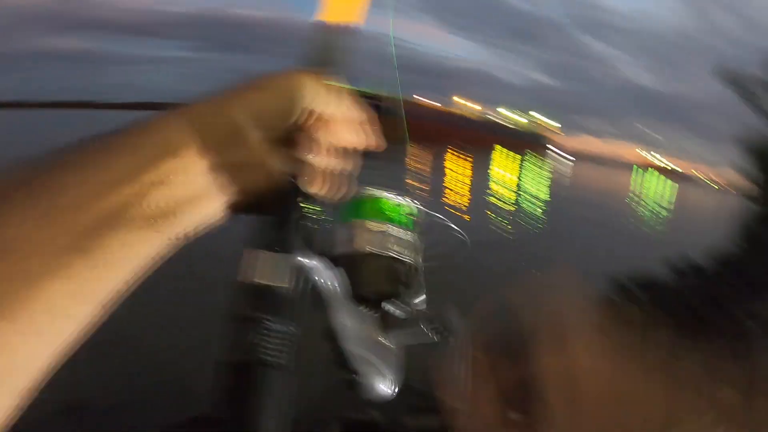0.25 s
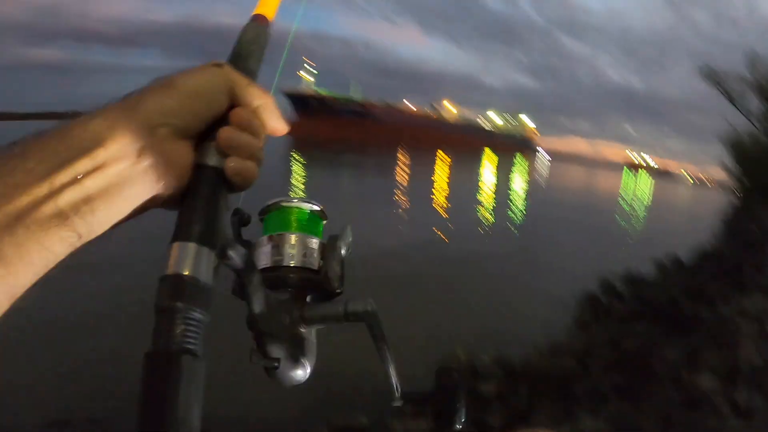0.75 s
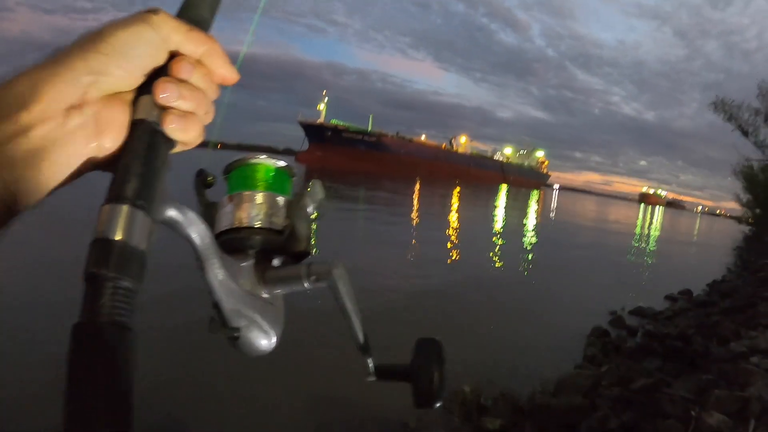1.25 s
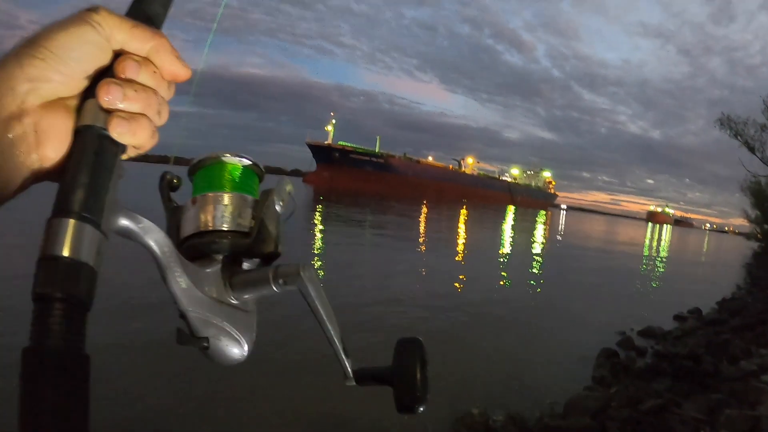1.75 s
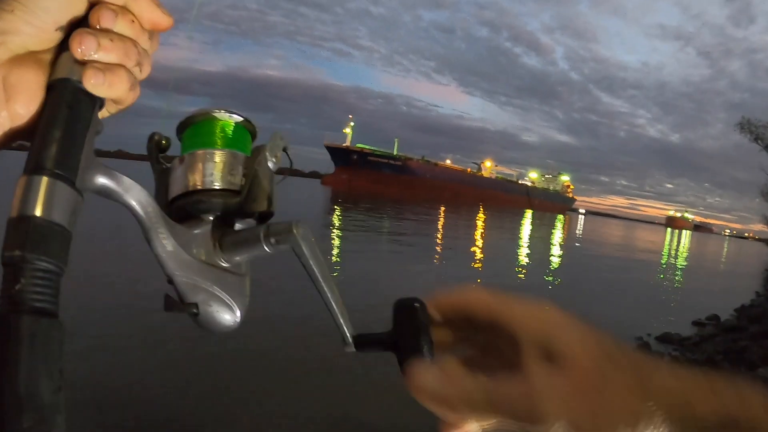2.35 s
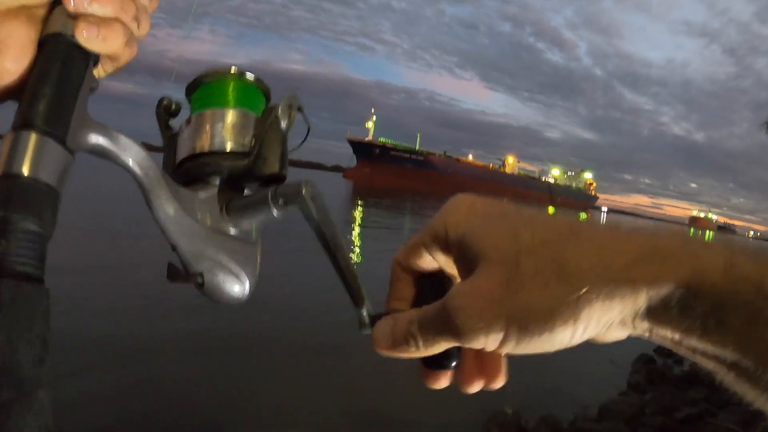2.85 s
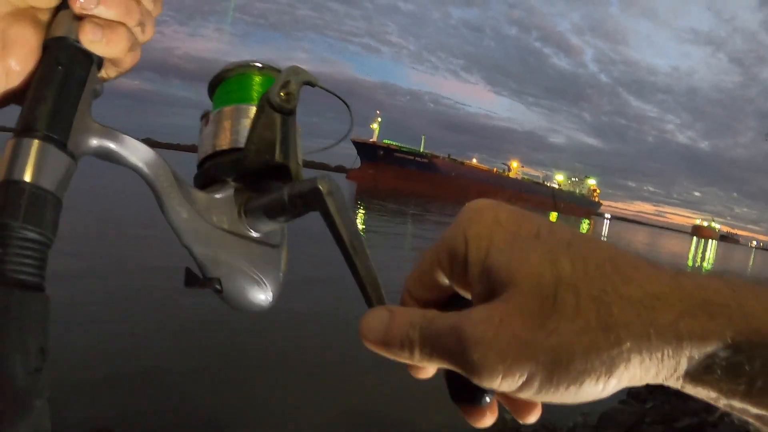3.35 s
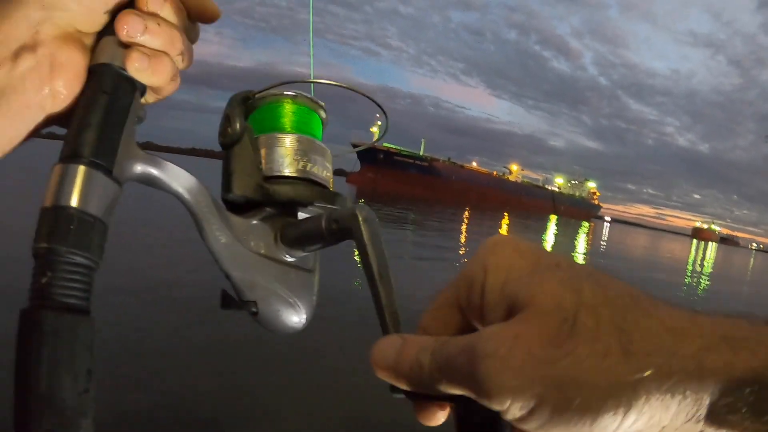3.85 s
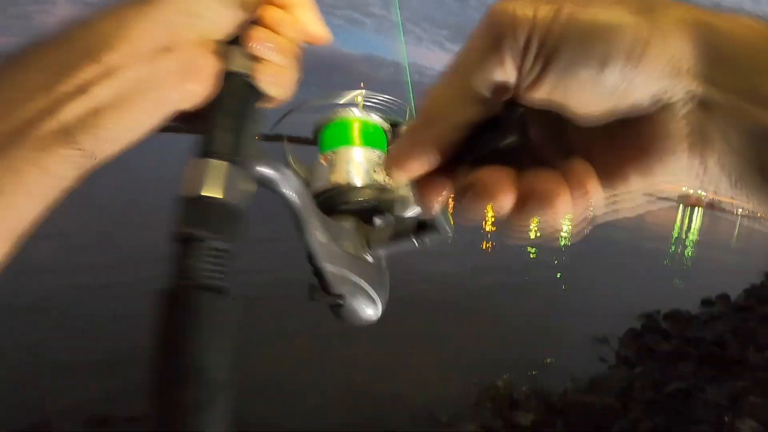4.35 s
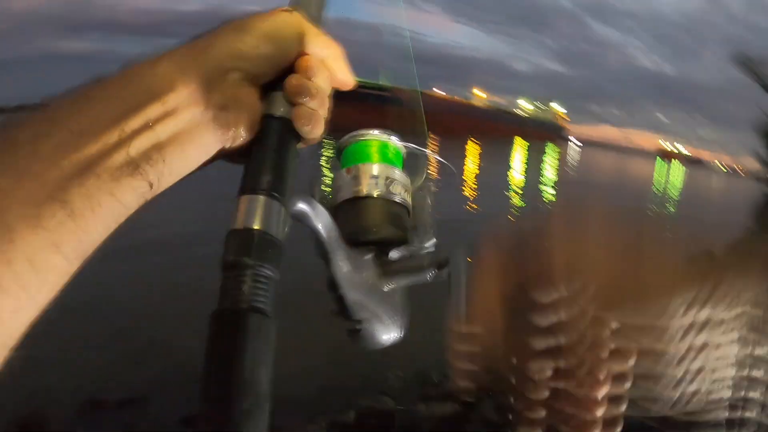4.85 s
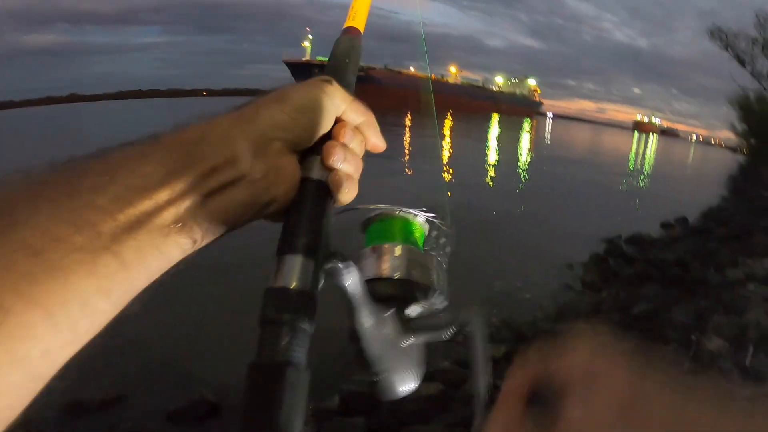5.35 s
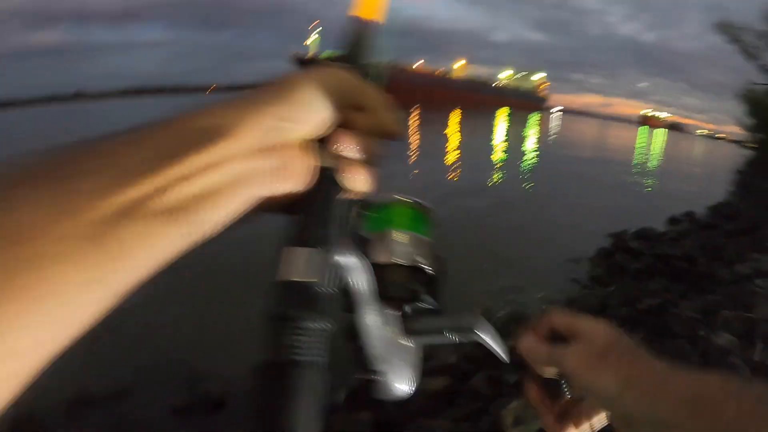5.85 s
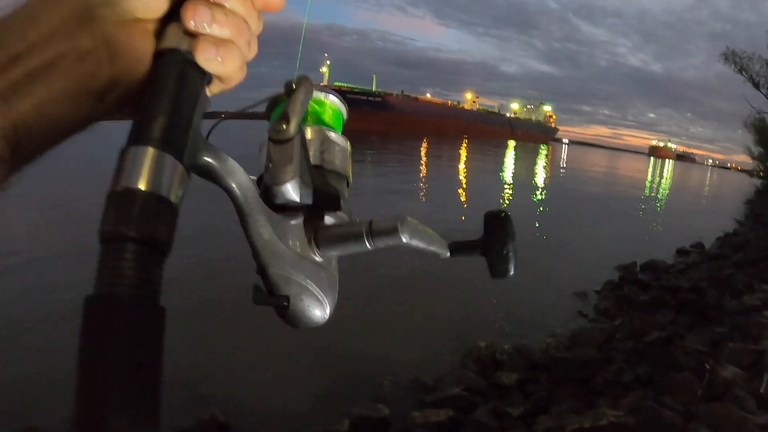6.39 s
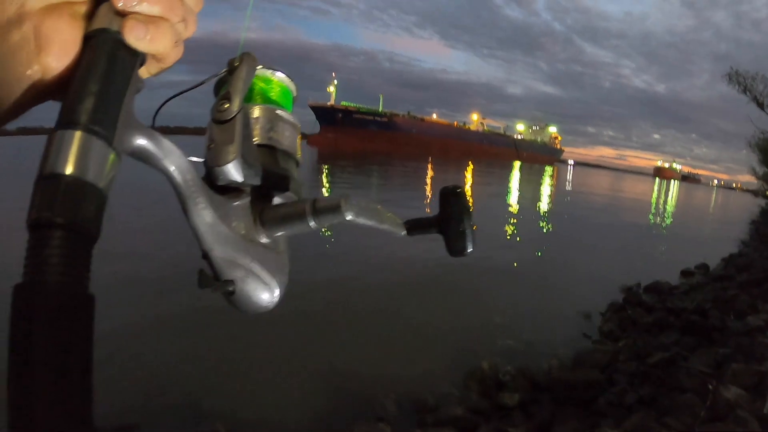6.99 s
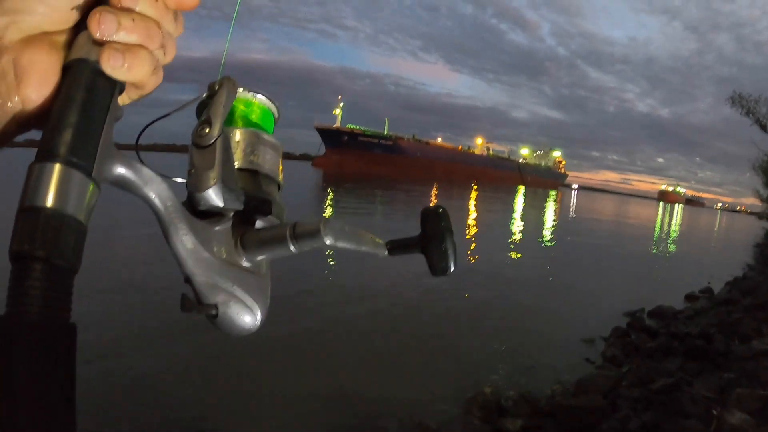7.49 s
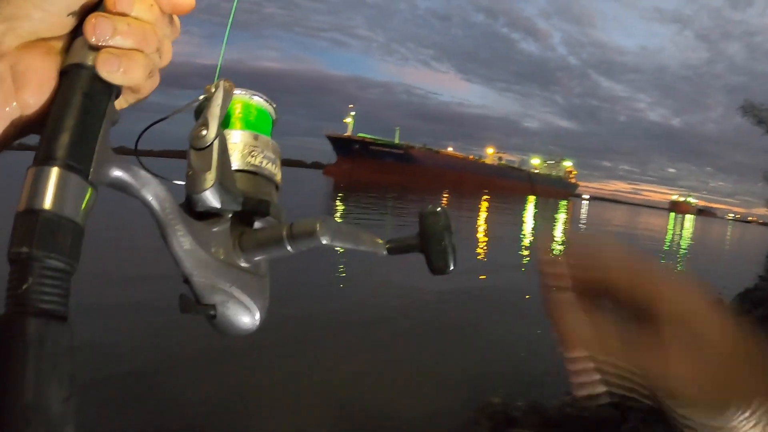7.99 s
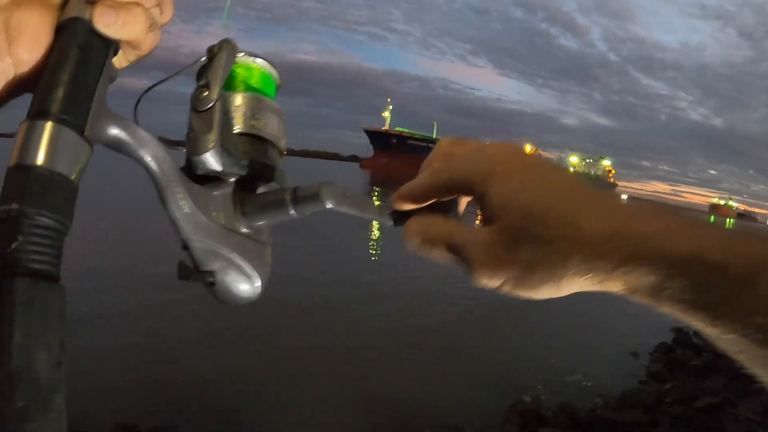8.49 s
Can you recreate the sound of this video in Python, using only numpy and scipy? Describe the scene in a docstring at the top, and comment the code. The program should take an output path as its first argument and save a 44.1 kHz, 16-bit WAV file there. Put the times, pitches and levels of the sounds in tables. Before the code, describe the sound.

Distant ship engines throb deeply while a fishing reel close by whirrs, ticks, squeaks and clacks to a stop twice, under a faint high whine.

```python
"""Reel by a working river

Far out on a river a ship and its tugs drone: the partials of four engine cycles over smooth low rumble.
Close by, a spinning reel is wound in two long bouts and a few short nudges. Gear teeth scuff body resonances
and the rotor hisses; struck parts tick and knock, parts rub, the line roller squeaks, line and wire snap.
A thin steady whine, a single tone with a faint flutter, hangs above everything, almost wholly on the left.
"""
import sys
import numpy as np
from scipy import signal
from scipy.fft import rfft, irfft
from scipy.io import wavfile

SR = 44100
rng = np.random.default_rng(int(sys.argv[2]) if len(sys.argv) > 2 else 0)


def master(y):
    """Save y as 16-bit WAV."""
    cut = np.clip(np.atleast_2d(y).T, -1, 1)
    pcm = np.round(cut * 32767)  # scale
    wavfile.write(sys.argv[1], SR, pcm.astype(np.int16))


N = 384993
T = np.arange(N) / SR   # seconds
HZ = np.maximum(np.arange(N // 2 + 1) * SR / N, 1)   # frequency of each FFT bin

# Engine cycle rates; the governor of the main engine hunts. Each row: time in seconds, cycle rate in Hz.
MAIN_CYCLE = [(0, 9.61), (.5, 9.619), (1.4, 9.595), (2.05, 9.625), (3.1, 9.604), (3.85, 9.617),
              (4.55, 9.595), (5.15, 9.629), (5.9, 9.611), (6.4, 9.588), (7.5, 9.608), (8.0, 9.633),
              (8.45, 9.604), (8.73, 9.609)]
SLOW_CYCLE = [(0, 5.9936), (8.73, 6.0024)]
TUG_CYCLE = [(0, 8.6776), (8.73, 8.6864)]
FAST_CYCLE = [(0, 22.455), (8.73, 22.473)]
# Exhaust partials of each engine. Each row: multiple of the cycle rate, early level in dB, late level in dB.
MAIN_PARTIALS = [(4, -52, -56), (7, -46, -46), (8, -47, -46), (9, -55, -59), (11, -53, -55), (12, -47, -35),
                 (13, -52, -49), (14, -52, -52), (15, -51, -49), (16, -31, -30), (17, -39, -38),
                 (18, -44, -50), (19, -40, -44), (20, -53, -52), (21, -50, -59), (22, -55, -56),
                 (23, -50, -53), (24, -54, -49), (25, -56, -47), (26, -49, -49), (27, -41, -37),
                 (28, -59, -53), (29, -47, -46), (30, -52, -50), (31, -55, -53), (32, -62, -58),
                 (33, -53, -56), (34, -58, -58), (35, -58, -58), (36, -57, -57), (37, -56, -55),
                 (38, -62, -56), (45, -63, -61), (47, -62, -58), (48, -64, -59), (49, -58, -62),
                 (50, -61, -61), (51, -66, -63), (52, -66, -62), (55, -62, -61), (62, -68, -61),
                 (64, -64, -54), (65, -66, -62), (66, -63, -57), (67, -61, -52), (68, -66, -62),
                 (69, -63, -56), (70, -63, -62), (72, -68, -64)]
SLOW_PARTIALS = [(5, -57, -56), (6, -42, -42), (7, -54, -52), (8, -50, -49), (9, -43, -44), (11, -49, -50),
                 (12, -37, -37), (14, -45, -44), (20, -46, -45), (21, -49, -50), (36, -61, -57),
                 (39, -58, -57)]
TUG_PARTIALS = [(12, -51, -50), (14, -52, -50), (15, -50, -55), (16, -39, -39), (17, -50, -52),
                (20, -39, -41), (21, -44, -49), (29, -58, -58), (32, -55, -53), (33, -54, -62),
                (34, -58, -64)]
FAST_PARTIALS = [(2, -46, -45), (3, -40, -41), (4, -44, -48), (5, -44, -31), (6, -56, -56)]
# The exhausts swing from early to late colour between these two times.
MAIN_TURN_S, TUGS_TURN_S = (2.5, 5), (4, 8)

# Colour of distant rumble, wash and air. Each row: frequency in Hz, relative density in dB per Hz.
RUMBLE_COLOUR = [(15, -17.5), (25, -4.5), (40, 1), (70, 1.5), (100, -1), (130, 1), (200, -4), (270, -8),
                 (360, -10), (450, -12), (530, -15), (640, -20), (800, -21), (1000, -20), (1700, -32),
                 (2700, -40), (3700, -42), (4500, -51), (5000, -51), (5400, -43.5), (6200, -66),
                 (12000, -93.5)]
# Loudness of the rumble. Each row: time in seconds, level in dB.
RUMBLE_LEVEL = [(0, -33.5), (3, -33.5), (6, -33.5), (8.73, -33)]

# Pitch of the whine. Each row: time in seconds, frequency in Hz.
WHINE_PITCH = [(0, 5394.43), (8.73, 5395.1)]
WHINE_DB, WHINE_RIGHT_DB = -53.5, -33.5   # level on the left; leak into the right, relative to the left
WHINE_WANDER_RAD = 0.45

# Housing shadow on the two microphone ports, for the reel close by and for the river.
# Each row: frequency in Hz, left minus right in dB.
REEL_SHADOW = [(400, 1.5), (700, -3), (1050, -3.5), (1700, 1), (2800, 3.5), (3800, 5), (4700, -3.5),
               (6000, -1.5), (8000, -10.5), (11000, -8), (15000, -3.5)]
RIVER_SHADOW = [(60, .7), (200, .1), (400, .8), (700, 0.9), (1050, 1.2), (1700, 5.3), (2800, 1.9),
                (3800, 11), (4700, 2.9), (6000, 1.5)]
# Share that each port hears alone, for reel and river. Each row: frequency in Hz, level in dB re the shared sound.
REEL_UNLIKE = [(640, -2.5), (1050, -8.5), (1700, -16.5), (2800, -9.5), (3800, -3), (4700, -3), (6000, 2),
               (8000, 3)]
RIVER_UNLIKE = [(30, -18.5), (100, -14.5), (300, -17.5), (640, -2.5), (1050, -6), (1700, -7.5),
                (3800, -2.5), (4700, 2), (6000, 9)]
LEFT_LAG_S = 2.6 / SR

# Dry high snaps of line and bail wire. Each row: time in seconds, peak level in dB ahead of the treble filter.
SNAPS = [(0.0796, -37.5), (0.13, -39.5), (0.147, -38.5), (0.19, -41.5), (0.2339, -35), (0.3825, -39),
         (0.497, -32.5), (0.5801, -28.5), (0.6745, -37), (0.706, -40), (0.7635, -38), (0.804, -47),
         (0.9875, -64), (1.8655, -70), (2.5476, -67.5), (2.57, -57), (2.6951, -65.5), (2.7316, -70.5),
         (2.771, -69.5), (2.8573, -72), (3.1591, -65), (3.192, -65), (3.2908, -64.5), (3.4549, -71.5),
         (3.6856, -52.5), (4.063, -51.5), (4.2845, -24.5), (4.3789, -42.5), (4.451, -47), (4.4781, -29),
         (4.5524, -37), (4.6069, -44), (4.721, -46), (4.7991, -27.5), (4.9955, -44.5), (5.068, -51),
         (5.1173, -46.5), (5.2224, -28.5), (5.2764, -40.5), (5.3993, -37.5), (5.5396, -45), (5.5987, -41),
         (5.6645, -37.5), (5.695, -28.5), (5.964, -57), (5.994, -29), (6.5051, -41.5)]
SNAP_T60_S = 0.0074
# Faint snaps: upper level re the rotor hiss; at rest, rod and line creak faintly in the hand at the idle level.
FAINT_SNAPS_PER_S, FAINT_SNAP_DB, IDLE_SNAP_DB = 17, 27, -74

# Short squeaks of the line roller.
# Each row: time in seconds, peak level in dB, starting pitch in Hz, decay by 60 dB in seconds.
SQUEAKS = [(0.19, -26.5, 2954, 0.033), (0.308, -37, 2703, 0.031), (0.522, -34, 3180, .03),
           (0.706, -32.5, 3560, .03), (4.563, -37, 3710, 0.044), (5.633, -34.5, 2910, 0.031),
           (5.745, -29.5, 2850, 0.035), (5.762, -29.5, 3050, 0.031), (5.769, -34, 3040, .02),
           (5.78, -38.5, 3110, 0.043), (5.804, -23.5, 3119, 0.0258), (5.814, -35.5, 3050, .02),
           (5.843, -32.5, 3157, .05), (6.008, -24.5, 3235, .05), (6.024, -37, 3223, 0.054),
           (6.604, -50.5, 2987, 0.0396), (6.982, -41, 3050, 0.066)]
SQUEAK_RISE_S, SQUEAK_GLIDE_HZ_PER_S = .002, 10000

# Slow or dragging turns of the handle rub one part into a narrow ring.
# Each row: the two ends of the stroke in seconds (either order), pitch in Hz, width in Hz, level in dB.
RUBS = [(3.37, 3.46, 2220, 300, -52), (3.6, 3.77, 2120, 340, -60), (3.83, 4.51, 2260, 240, -53),
        (6.02, 6.01, 2143, 147, -46), (6.45, 6.277, 3360, 300, -52.5)]

# Ticks and knocks of the reel. Each row: time in seconds, nominal level in dB, pitch of the struck part in Hz,
# boost of the low thump modes in dB, boost of the high crack modes in dB.
TICKS = [(0.0482, -27, 1345, 2.5, -25.5), (0.188, -47, 2900, -23, -30), (0.238, -32, 1717, -6.5, -25),
         (0.3105, -31, 2650, -12, -25), (0.385, -31.5, 2400, -10.5, -27), (0.4546, -36.5, 2420, 0.5, -25),
         (0.5, -34, 2920, -9, -22.5), (0.5227, -39.5, 3080, -2, -25.5), (0.5621, -40.5, 2390, -12, -25),
         (0.59, -29, 3146, -2, -14.5), (0.621, -27.5, 3100, -10, -25), (0.675, -35.5, 2210, -13, -20.5),
         (0.708, -44.5, 3555, -9.5, -19.5), (0.744, -32.5, 3750, -4, -20),
         (0.7632, -18.5, 1790, -5.5, -4.5), (0.7655, -13.5, 3365, -16, -18.5),
         (0.7696, -18.5, 3034, -10.5, -7.5), (0.775, -29.5, 2500, -4, -11.5), (0.7838, -28, 3760, -9, -9),
         (0.7872, -25, 3670, -20, -7.5), (0.795, -28.5, 3660, 0, -8), (0.7998, -28.5, 3640, -11, -14),
         (0.804, -29, 2930, -10, 1), (0.826, -30, 3300, -10, -21.5), (0.83, -15.5, 2763, -18.5, -22),
         (0.862, -34.5, 2940, -16, -37), (0.869, -38, 3607, -12, -30.5), (0.918, -40.5, 2580, -13.5, -7),
         (0.933, -45, 3270, -4.5, -22), (0.987, -45, 2500, -6, -19), (1.061, -46, 3590, -6, -8),
         (1.093, -42.5, 3430, -7, -24.5), (2.2767, -42.5, 3860, -10.5, -34), (2.383, -38, 2393, -13, -26.5),
         (2.388, -35, 1900, -11, -33.5), (2.462, -39, 2774, -5, -34), (2.546, -34.5, 2585, -11, -15.5),
         (3.6022, -38.5, 2123, -14, -30.5), (3.617, -41.5, 2100, -15, -31.5),
         (3.6341, -50, 3231, -11.5, -28.5), (3.6664, -56.5, 2000, -8, -28), (3.686, -28, 2100, 1.5, -24),
         (3.696, -41, 2980, -5.5, -6), (3.718, -34.5, 2130, -2, -24.5), (3.728, -45, 2120, -6.5, -30.5),
         (3.7396, -30.5, 2200, 8.5, -31.5), (3.7653, -38, 1670, 13, -29), (3.78, -32.5, 2930, 1.5, -19.5),
         (3.8152, -34, 2090, -5.5, -31.5), (3.9365, -44.5, 2050, -12, -31),
         (3.956, -48.5, 2115, -11, -28.5), (3.981, -29, 2130, 4.5, -39.5),
         (4.0128, -32.5, 2140, -13.5, -35), (4.039, -29, 2372, -1, -26.5), (4.053, -36.5, 3300, -8, -5.5),
         (4.0687, -30.5, 2190, -8, -29), (4.093, -34, 2070, -9.5, -32.5), (4.105, -26, 2140, -4, -19),
         (4.148, -31.5, 2140, -2.5, -28), (4.182, -31, 2310, -5.5, -26), (4.2153, -31.5, 2356, 6.5, -26),
         (4.2363, -32.5, 1880, -6.5, -27.5), (4.2834, -23.5, 2578, 2.5, -31.5),
         (4.3151, -36, 2280, -13.5, -28), (4.38, -30.5, 2320, -14, -6), (4.4518, -35.5, 2100, -12, -25),
         (4.5955, -38.5, 1770, -10, -26.5), (4.621, -31, 1600, -4, -26.5), (4.7451, -41.5, 1860, -11, -28),
         (4.774, -47, 1807, -17, -29), (4.817, -27.5, 1760, -3, -25.5), (4.8548, -37.5, 1900, -6.5, -28),
         (4.96, -30, 1890, -8.5, -32.5), (4.983, -29.5, 1690, -9, -24), (5.023, -25.5, 1784, -10, -25.5),
         (5.04, -26, 2520, -21, -23), (5.069, -30.5, 1860, -14.5, -5), (5.222, -30.5, 3250, -9, -19.5),
         (5.269, -30.5, 1730, -11, -20.5), (5.283, -43.5, 2600, -14, -25.5),
         (5.2992, -30, 3067, -13, -15.5), (5.38, -27, 1800, -7.5, -30), (5.53, -40.5, 2900, -15.5, -22),
         (5.591, -25.5, 1777, 4.5, -25), (5.634, -31, 2928, 3.5, -12), (5.664, -28.5, 3070, -4.5, -21),
         (5.7049, -32, 3130, -8, -6), (5.68, -34.5, 1900, -6.5, -22.5), (5.804, -35, 3700, -15.5, -18),
         (5.843, -35, 2600, -10, -11.5), (5.958, -40.5, 3950, -4, -19), (5.988, -31, 1935, -10.5, -6),
         (5.995, -15, 2240, -4.5, -6.5), (5.999, -14.5, 3287, -7.5, -15), (6.0023, -13, 1578, -0.5, -15.5),
         (6.008, -28.5, 3520, 1, -12), (6.0203, -21.5, 1710, 1, -23.5), (6.0697, -19.5, 1853, -11.5, -13),
         (6.087, -31.5, 3030, -19.5, -37), (6.113, -28, 2384, -20, -32),
         (6.1265, -29.5, 2960, -14.5, -41.5), (6.279, -31.5, 1260, 0.5, -30), (6.35, -38, 3950, -12, -23.5),
         (6.504, -37.5, 3640, -25.5, -9.5), (6.604, -42, 3072, -3.5, -25),
         (6.764, -43.5, 3670, -20.5, -9.5), (6.515, -47, 3720, -21.5, -20),
         (6.528, -45.5, 3590, -18.5, -13.5), (6.77, -46.5, 3520, -16.5, -12.5),
         (6.9169, -50, 3480, -14.5, -24.5), (6.9773, -33.5, 3129, -11, -23.5), (7.66, -41.5, 1622, -6, -35),
         (7.812, -49, 4400, -21.5, -23.5), (8.042, -50.5, 1760, 2.5, -34), (8.21, -36.5, 3660, -14, -27),
         (8.516, -56, 5294, -10.5, -10.5), (8.645, -58.5, 5300, -11.5, -5.5), (1.566, -45, 3440, -16, -21),
         (8.668, -55, 3950, -9.5, -12.5)]
# Modes a tick can ring with. Each row: frequency in Hz, relative level in dB, decay by 60 dB in seconds.
REEL_MODES = [(527, 0.5, 0.016), (920.6, 0, 0.025), (1159, -5, 0.012), (1605, -13, 0.0088),
              (1758, 1.5, 0.016), (2107, 4, 0.0087), (2330.4, -3.5, 0.014), (2859, -0.5, 0.011),
              (3204, 0, 0.018), (3449, 1, .014), (3879, -1, 0.015), (4103, -8.5, 0.0091), (5482, -3, 0.01),
              (6087, 12.5, 0.0035), (7090, 2, 0.013), (7680, 1, 0.0097), (8490, -3.5, 0.014),
              (9800, -1, 0.0037), (10500, -10.5, .005), (12700, -12, .004)]
THUMP_TOP_HZ, CRACK_FOOT_HZ = 1400, 6000
# Between soft and hard touches these two slide: decay of the struck part, and how far other modes fall behind.
SOFT_DB, HARD_DB = -40, -24
SOFT_PART_T60_S, HARD_PART_T60_S = .022, .010
SOFT_FAR_DB, HARD_FAR_DB = 15, 8
# Contacts in a tick: decay for a -9.5 dB knock, and the step in dB that doubles it.
RATTLE_T60_S, RATTLE_DOUBLES_DB, RATTLE_RISE_S = 0.00788, 20, 0.00051
TICK_PAN_DB = 0.5   # left-right scatter
# Faint ticks of loose parts: upper level re the whirr, then their thump and crack boosts.
LOOSE_PER_S, LOOSE_DB, LOOSE_THUMP_DB, LOOSE_CRACK_DB = 30, -9, -4.5, -23
MOST_TICKS = 250

# Turning the handle, one list per stroke. Each row: time in seconds, gear whirr in dB, rotor hiss in dB,
# swell of the side-plate ring in dB.
WINDING = [
    [(0.0, -35, -60, 1), (0.3, -35, -54, 4), (0.36, -39.5, -56.5, 2), (0.43, -32.5, -51, 1.5),
     (0.65, -37, -56.5, 2), (0.71, -44.5, -61.5, -4), (0.75, -53.5, -50.5, -13.5), (0.9, -59, -72.5, -6.5),
     (1.12, -62.5, -77, -2.5)],
    [(3.3, -60.5, -85.5, -2), (3.42, -41, -85, 5), (3.53, -65.5, -93.5, 0.5)],
    [(3.57, -62.5, -87, -0.5), (3.61, -58, -88.5, -1.5), (3.75, -45, -79.5, 5), (3.82, -45.5, -84, 0.5),
     (3.87, -77, -89.5, 0)],
    [(3.9, -57, -89, 3.5), (3.98, -52.5, -90, 6.5), (4.07, -43, -86.5, 0), (4.27, -42, -63.5, -1),
     (4.55, -40.5, -59.5, -1), (4.78, -41, -59, -1.5), (4.83, -36.5, -59, 2.5), (4.93, -40.5, -59, 2),
     (5.07, -37, -55.5, 5), (5.17, -42, -58.5, -4.5), (5.28, -38.5, -56.5, 2.5), (5.44, -44, -63, 3.5),
     (5.55, -39.5, -59.5, -3), (5.69, -37.5, -53.5, 4), (5.8, -42.5, -57.5, -6), (5.94, -51, -78.5, 0.5),
     (5.98, -48.5, -52.5, 6.5), (6.1, -66.5, -73, -3.5)],
    [(6.19, -72, -83.5, -5), (6.27, -39, -87, 1), (6.32, -64, -84, 1.5)],
]
# Reel body under running gears. Each row: resonance in Hz, width in Hz, relative level in dB.
GEAR_BODY = [(542.6, 234, -7), (980, 180, -4.5), (1243.8, 81, 2), (1460, 1000, -9.5), (1750, 500, -16),
             (1917.7, 170, -5), (2205.5, 140, -6), (2408, 125, -1.5), (2846, 440, -12), (3267, 470, -11.5),
             (3648, 220, -12), (3960, 2000, -23)]
SIDE_PLATE_HZ = (1100, 1400)
# Colour of the rotor hiss. Each row: frequency in Hz, relative density in dB per Hz.
ROTOR_COLOUR = [(4000, -12), (6000, 6), (7000, -5), (8600, -3), (10000, -10.5), (12400, -9.5),
                (13500, -26.5), (16000, -26)]
# Gear teeth meshing. Each row: time in seconds, teeth per second.
MESH_RATE = [(0, 58), (.52, 59), (.7, 57), (3.3, 28), (4.4, 30), (4.75, 40), (5.0, 44.5), (5.45, 46.5),
             (5.9, 50.5)]
MESH_DEPTH_DB, MESH_JITTER_RAD = 4, .6
# The louder the rotor hiss, the brighter the gears: dB per octave at FREE_HISS_DB, and its gain per dB of hiss.
BRIGHT_DB, BRIGHT_PER_DB, FREE_HISS_DB = -1.0, .06, -54.5
# Listed ticks jolt gears and rotor into a short scuff: scuff re the tick, hiss re the scuff.
JOLT_DB, JOLT_HISS_DB, JOLT_T60_S = -16, -17.5, 0.072
# Body resonances slide as the load on the turning parts shifts: share of the speed, changes per second.
WAVER_SHARE, WAVER_PER_S = .022, 6.0


def from_db(db):
    """Decibels to gain."""
    return 10 ** (np.asarray(db) / 20)


def rms_one(x):
    """Scale to rms 1."""
    return x / np.sqrt(np.mean(x ** 2) + 1e-20)


def per_bin(points):
    """Turn (Hz, dB) rows into a gain at every FFT bin."""
    hz, level_db = np.transpose(points)
    return from_db(np.interp(np.log(HZ), np.log(hz), level_db))


def coloured(x, points):
    """Filter by (Hz, dB) rows."""
    return irfft(rfft(x) * per_bin(points), N)


def drift(rate):
    """Slow random wandering, around `rate` changes a second, with spread 1."""
    knots = rng.standard_normal(int(T[-1] * 60) + 60)   # 60 a second
    r = np.exp(-2 * np.pi * rate / 60)
    slow = signal.lfilter([1], [1, -2 * r, r * r], knots)[58:]
    return np.interp(T * 60, np.arange(len(slow)), rms_one(slow))


def turning(rate_hz):
    """Phase in radians of a cycle whose rate follows (s, Hz) rows."""
    return 2 * np.pi * np.cumsum(np.interp(T, *np.transpose(rate_hz))) / SR


def dying(events, t60):
    """Envelope that jumps at each (s, dB) row and dies away exponentially."""
    kicks = np.full(N, 1e-18)
    s, level_db = np.transpose(events)
    np.add.at(kicks, np.round(s * SR).astype(int), from_db(level_db))
    return signal.lfilter([1], [1, -from_db(-60 / (t60 * SR))], kicks)


def at_random(per_s):
    """Chance moments in seconds, each with four draws from 0 to 1."""
    draws = rng.random((500, 5))
    s = np.cumsum(-np.log(draws[:, 0])) / per_s
    inside = s < T[-1]
    return s[inside], draws[inside, 1:]


def grains(per_s, spread_db):
    """Random small contacts of uneven size and either polarity."""
    sizes = from_db(spread_db * np.minimum(rng.exponential(1, N), 5))
    signs = rng.choice([-1, 1], N)
    return sizes * signs * (rng.random(N) < per_s / SR)


def resonance(x, hz, width_hz):
    """Two-pole peak applied twice, so the valleys beside it stay dark."""
    r = np.exp(-np.pi * width_hz / SR)
    section = [(1 - r * r) / 2, 0, (r * r - 1) / 2, 1, -2 * r * np.cos(2 * np.pi * hz / SR), r * r]
    return signal.sosfilt([section, section], x)


def per_port(make, unlike=REEL_UNLIKE):
    """One shared sound plus a share that each port hears alone; `make` draws a fresh sound."""
    shared = make()
    return shared + np.array([coloured(make(), unlike) for port in range(2)])


def ports(x, shadow):
    """Sound reaches the left port late, and the housing shades each port in its own way."""
    tilt = np.sqrt(per_bin(shadow))   # half the difference for each port
    lag = np.exp(-2j * np.pi * HZ * LEFT_LAG_S)
    return irfft(rfft(x) * [tilt * lag, 1 / tilt], N)


def rumble():
    """Distant wash: smooth noise, shaped in frequency, whose level ripples slightly."""
    noise = per_port(lambda: rng.standard_normal(N), RIVER_UNLIKE)
    noise = noise * from_db(.5 * drift(5.4))
    s, level_db = np.transpose(RUMBLE_LEVEL)
    return from_db(np.interp(T, s, level_db)) * rms_one(coloured(noise, RUMBLE_COLOUR))


def engine(rate_hz, partials, turn_s):
    """Partials of one firing cycle; its speed hunts a little, and the air over the water makes each fade."""
    step = 8   # the low partials are built at an eighth of the sample rate
    cycle = (turning(rate_hz) + .004 * drift(0.26))[::step]
    out = 0
    for multiple, early_db, late_db in partials:
        trend_db = np.interp(T, turn_s, [early_db, late_db])
        level_db = trend_db + .8 * drift(0.99)
        tone = np.sin(multiple * cycle + rng.uniform(0, 2 * np.pi))
        out = out + np.sqrt(2) * from_db(level_db[::step]) * tone
    return signal.resample_poly(out, step, 1)[:N]


def engines():
    """Four engines at unrelated speeds beat against each other."""
    return (engine(MAIN_CYCLE, MAIN_PARTIALS, MAIN_TURN_S)
            + engine(SLOW_CYCLE, SLOW_PARTIALS, TUGS_TURN_S)
            + engine(TUG_CYCLE, TUG_PARTIALS, TUGS_TURN_S)
            + engine(FAST_CYCLE, FAST_PARTIALS, TUGS_TURN_S))


def whine():
    """A near-pure tone whose level flutters faintly and whose phase wanders."""
    level = from_db(WHINE_DB + 0.61 * drift(25))
    return np.sqrt(2) * level * np.sin(turning(WHINE_PITCH) + WHINE_WANDER_RAD * drift(2.7))


def handle():
    """Whirr, hiss and side-plate levels in dB as the handle turns; silent between strokes."""
    levels = np.full((3, N), -140.)
    for stroke in WINDING:
        s, *columns = np.transpose(stroke)
        turning_now = (T >= s[0]) & (T <= s[-1])
        levels[:, turning_now] = [np.interp(T[turning_now], s, column) for column in columns]
    return levels


def snaps():
    """Line and wire snap: bursts of dying noise, band-passed to the treble, with faint ones at random."""
    s, draws = at_random(FAINT_SNAPS_PER_S)
    _, hiss_db, _ = handle()
    top_db = np.maximum(hiss_db[(s * SR).astype(int)] + FAINT_SNAP_DB, IDLE_SNAP_DB)
    faint_db = top_db - 30 * draws[:, 0] ** .5
    envelope = dying(SNAPS + list(zip(s, faint_db)), SNAP_T60_S)
    treble = signal.butter(2, [5500, 14000], "band", fs=SR, output="sos")
    return signal.sosfilt(treble, envelope * per_port(lambda: rng.standard_normal(N)))


def squeaks():
    """Each slip of the line roller sings one pitch that climbs as it dies."""
    length = SR // 12
    t, out = T[:length], np.zeros(N + length)
    rise = np.minimum(t / SQUEAK_RISE_S, 1)
    for s, peak_db, hz, t60 in SQUEAKS:
        at = round(s * SR)
        phase = 2 * np.pi * (hz * t + SQUEAK_GLIDE_HZ_PER_S * t * t / 2)
        out[at:at + length] += from_db(peak_db - 60 * t / t60) * rise * np.sin(phase)
    return out[:N]


def rubs():
    """Uneven slips excite one resonance under a stroke that swells and sinks."""
    slips, out = per_port(lambda: grains(per_s=1500, spread_db=3)), 0
    for start_s, end_s, hz, width_hz, level_db in RUBS:
        progress = np.clip((T - start_s) / (end_s - start_s), 0, 1)
        stroke = np.sin(np.pi * progress) ** .5
        out = out + from_db(level_db) * stroke * rms_one(resonance(slips, hz, width_hz))
    return out


def loose_ticks():
    """Loose parts tick at random moments, louder with the whirr; rows like TICKS."""
    s, draws = at_random(LOOSE_PER_S)
    whirr_db, _, _ = handle()
    peak_db = whirr_db[(s * SR).astype(int)] + LOOSE_DB - 10 * draws[:, 0]
    return [(at, db, 1650 * 2 ** high, LOOSE_THUMP_DB, LOOSE_CRACK_DB)   # pitched within one octave
            for at, db, high in zip(s, peak_db, draws[:, 1]) if db > -70]


def ticks():
    """A short dying rattle of contacts rings the modes; the struck part and modes near it are favoured."""
    length = SR // 12
    t, out = T[:length], np.zeros((2, N + length))
    hz, mode_db, t60 = np.transpose(REEL_MODES)[:, :, None]
    soft_start = 1 - np.exp(-(2 * t * hz) ** 2)   # a contact lasts about a cycle
    rings = np.sin(2 * np.pi * hz * t) * from_db(-60 * t / t60) * soft_start
    rise = np.minimum(t / RATTLE_RISE_S, 1)
    for s, peak_db, part_hz, thump_db, crack_db in (TICKS + loose_ticks())[:MOST_TICKS]:
        far_db = np.interp(peak_db, [SOFT_DB, HARD_DB], [SOFT_FAR_DB, HARD_FAR_DB])
        near_db = -np.minimum(36 * abs(np.log2(hz / part_hz)), far_db)   # 36 dB per octave away
        upper_db = np.where(hz > CRACK_FOOT_HZ, crack_db, near_db)
        boost_db = np.where(hz < THUMP_TOP_HZ, thump_db, upper_db)
        chance_db = 2 * rng.standard_normal((len(REEL_MODES), 1))
        ring = np.sum(from_db(mode_db + boost_db + chance_db) * rings, axis=0)

        rattle_t60 = max(RATTLE_T60_S * 2 ** ((peak_db + 9.5) / RATTLE_DOUBLES_DB), .002)
        noise = rng.standard_normal((3, length))
        contacts = noise[0] + noise[1:] / 2   # shared, plus half as much for each port alone
        rattle = rms_one(contacts * from_db(-60 * t / rattle_t60) * rise)
        tick = signal.fftconvolve(ring[None], rattle, axes=1)[:, :length] / length ** .5

        part_t60 = np.interp(peak_db, [SOFT_DB, HARD_DB], [SOFT_PART_T60_S, HARD_PART_T60_S])
        tick = tick + from_db(-60 * t / part_t60) * rise * np.sin(2 * np.pi * part_hz * t)
        pan_db = TICK_PAN_DB * rng.standard_normal() * np.array([[.5], [-.5]])
        at = round(s * SR)
        out[:, at:at + length] += from_db(peak_db + pan_db) * tick
    return out[:, :N]


def wavering(x):
    """Read at a speed that wanders, so that a resonance slides up and down in pitch."""
    at = np.clip(np.cumsum(1 + WAVER_SHARE * drift(WAVER_PER_S)), 0, N - 1)
    return np.array([np.interp(at, np.arange(N), port) for port in x])


def gear_whirr(hiss_db, plate_db):
    """Gear teeth scuff into the body resonances, swinging with each tooth; rms 1."""
    bright_db = BRIGHT_DB + BRIGHT_PER_DB * (np.maximum(hiss_db, -90) - FREE_HISS_DB)
    bright_db = np.clip(bright_db, -9, 9)
    teeth = per_port(lambda: grains(per_s=3000, spread_db=3.0))
    mesh = np.sin(turning(MESH_RATE) + MESH_JITTER_RAD * drift(10))
    teeth = teeth * from_db(MESH_DEPTH_DB * mesh)
    body = 0
    for k, (hz, width_hz, level_db) in enumerate(GEAR_BODY):
        band = wavering(resonance(teeth, hz, width_hz))
        gain_db = level_db + bright_db * np.log2(hz / 2000) + 1.5 * drift(8)
        if SIDE_PLATE_HZ[0] < hz < SIDE_PLATE_HZ[1]:
            gain_db = gain_db + np.where(plate_db < -99, 0, plate_db)   # no swell between strokes
        body = body + (-1) ** k * from_db(gain_db) * band   # polarity alternates from mode to mode
    return rms_one(body)


def rotor_hiss():
    """Rotor and line scratch: dense contacts in uneven patches, coloured to the treble; rms 1."""
    scratch = per_port(lambda: grains(per_s=9000, spread_db=2.5))
    patches = from_db(3 * drift(15))
    return rms_one(coloured(scratch * patches, [(2500, -36.5)] + ROTOR_COLOUR))


def winding():
    """The handle drives whirr and hiss; the listed ticks jolt both into short scuffs."""
    whirr_db, hiss_db, plate_db = handle()
    jolts = dying([(s, peak_db + JOLT_DB) for s, peak_db, *colour in TICKS], JOLT_T60_S)
    whirr = (from_db(whirr_db) + jolts) * gear_whirr(hiss_db, plate_db)
    hiss = (from_db(hiss_db) + from_db(JOLT_HISS_DB) * jolts) * rotor_hiss()
    return whirr + hiss


def scene():
    """River and reel as they reach the two ports; the whine sits almost wholly in the left channel."""
    river = ports(engines() + rumble(), RIVER_SHADOW)
    reel = ports(snaps() + squeaks() + rubs() + ticks() + winding(), REEL_SHADOW)
    return river + whine() * from_db([[0], [WHINE_RIGHT_DB]]) + reel


def record(dry):
    """The microphone fades around and above 13.5 kHz, and a steep filter cuts the top."""
    dry = signal.sosfilt(signal.butter(2, 13500, fs=SR, output="sos"), dry)
    # 70 dB down from 16.5 kHz up
    return signal.sosfilt(signal.cheby2(12, 70, 16500, fs=SR, output="sos"), dry)


dry = scene()
out = record(dry)
master(out)
```